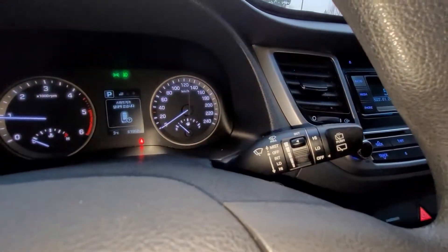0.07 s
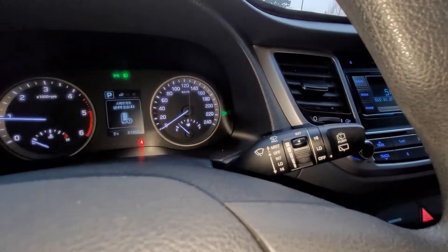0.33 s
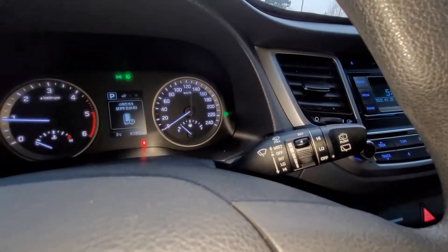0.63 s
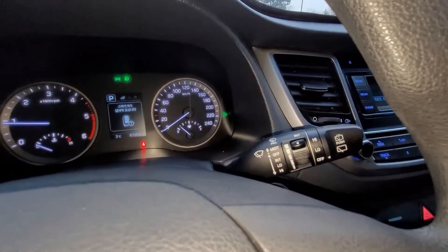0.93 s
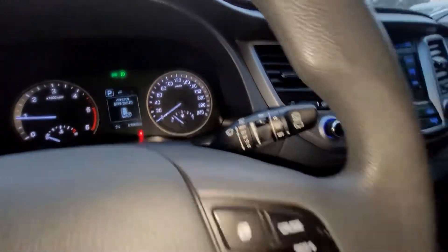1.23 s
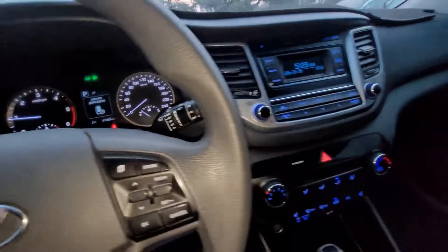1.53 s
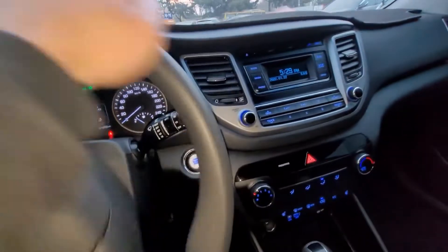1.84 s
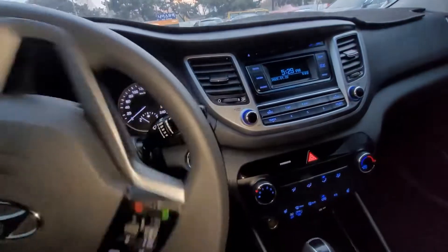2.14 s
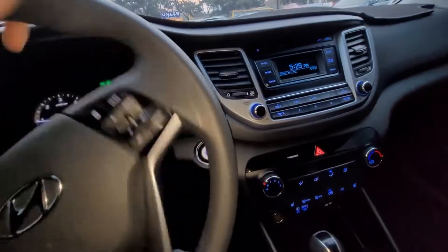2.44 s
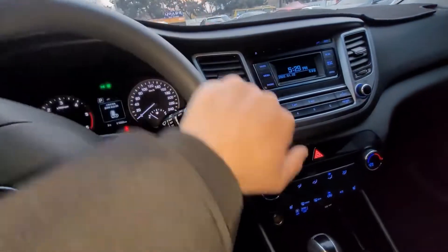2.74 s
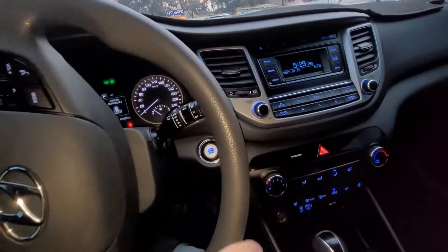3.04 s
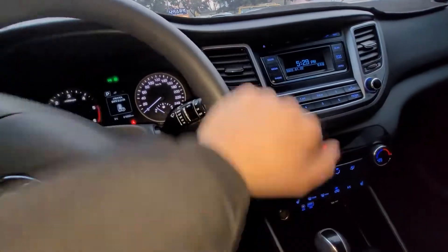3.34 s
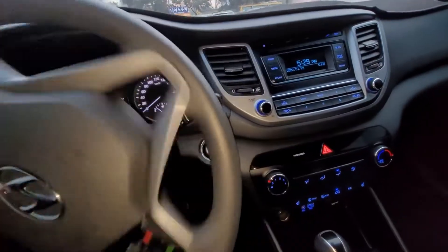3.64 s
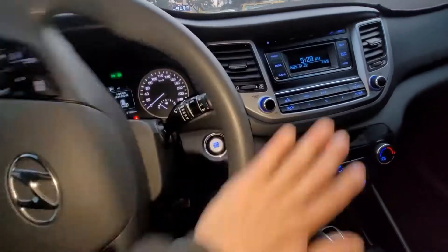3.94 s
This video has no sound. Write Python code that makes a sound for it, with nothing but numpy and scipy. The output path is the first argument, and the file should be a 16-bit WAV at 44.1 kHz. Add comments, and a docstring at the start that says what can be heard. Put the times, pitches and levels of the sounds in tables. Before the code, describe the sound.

Hands rub over a turning steering wheel inside a parked car. At first the engine idles with a low throb, a chugging hum and faint sleeve rustles. From about 1.2 seconds, hissing strokes swell over a low steering rumble and rough hum. Soft grip bumps come between 1.8 and 3.7 seconds. The rubbing dips near 3.3 seconds, then returns until 4 seconds, with the idle underneath.

```python
"""Inside a parked car the engine idles with a throbbing boom and a soft panel buzz. A steady, chugging
hum fills the cabin and sinks as the wheel turns. A sleeve rustles faintly, then from 1.2 s the steering
wheel is spun. Hand and sleeve slide over the grained rim in swelling strokes of hiss, the turning
column rumbles over a rough low hum, and the hand bumps the wheel a few times as it changes grip."""
import sys
import numpy as np
from scipy import signal
from scipy.fft import rfft, irfft, next_fast_len
from scipy.io import wavfile
from scipy.ndimage import uniform_filter1d, map_coordinates

SR = 44100
rng = np.random.default_rng(int(sys.argv[2]) if len(sys.argv) > 2 else 0)


def transcribe(signal):
    """Save signal, clipped to [-1, 1], as a 16-bit WAV file at the path in sys.argv[1]."""
    frames = np.atleast_2d(signal).T
    limited = np.clip(frames, -1, 1)
    pcm = np.round(limited * 32767).astype(np.int16)
    wavfile.write(sys.argv[1], SR, pcm)


N = 176400

CHUG_HZ, FIRST_CHUG_S = 20.01, 0.0141  # the beat shared by the chugging hum and the cabin noise

# Stereo width of rubbing hand and cloth. Each row: frequency in Hz, left-right likeness from -1 to 1.
RUB_LIKENESS = [(250, 0.45), (550, 1), (1100, 0.088), (1450, -0.47), (1750, -0.25), (2200, -0.012),
                (15000, 0.073)]
# Balance of the cabin, with the treble to the right. Each row: frequency in Hz, left minus right in dB.
CABIN_BALANCE = [(100, 4.5), (300, -1), (700, 0), (1300, -4), (2400, -11), (4400, -12), (8000, -4),
                 (15000, -3)]


def amp(db):
    """Decibels to gain."""
    return 10 ** (np.asarray(db) / 20)


def unit(x):
    """Scaled to rms 1."""
    return x / np.sqrt(np.mean(x ** 2) + 1e-20)


def along(points, hz):
    """(Hz, value) points read on a log axis."""
    knots_hz, values = np.transpose(points)
    return np.interp(np.log(hz + 1), np.log(knots_hz + 1), values)


def clock():
    """Time of every sample in seconds."""
    return np.arange(N) / SR


def curve(rows):
    """(s, value) points joined by straight lines."""
    return np.interp(clock(), *np.transpose(rows))


def wobble(rate):
    """A smooth random curve, rate knots a second."""
    return map_coordinates(rng.standard_normal(int(N * rate / SR) + 4), [clock() * rate])


def filtered(x, response):
    """x shaped by a response given as a function of Hz."""
    size = next_fast_len(N + SR // 2)
    return irfft(rfft(x, size) * response(np.fft.rfftfreq(size, 1 / SR)), size)[..., :N]


def white():
    """Two unrelated white noises."""
    return rng.standard_normal((2, N))


def coloured(pair, spectrum, likeness, balance=None):
    """Two unrelated signals given a spectrum, a left-right likeness and a balance; rms 1."""
    def mid_side_gains(hz):
        width = np.arccos(np.clip(along(likeness, hz), -1, 1)) / 2
        return amp(along(spectrum, hz)) * [np.cos(width), np.sin(width)]

    mid, side = filtered(pair, mid_side_gains)
    out = np.array([mid + side, mid - side])
    if balance is not None:
        out = filtered(out, lambda hz: amp(along(balance, hz) * np.array([[.5], [-.5]])))
    return unit(out)


def moving_contact(pair, patch_db=2.02, patch_hz=260, patch_s=.04, tilt_db=0.35, pivot_hz=5240):
    """Rubbing shifts colour as the contact moves: random patches of gain and a drifting treble."""
    hz, t, spectra = signal.stft(pair, SR, nperseg=512)
    patches = uniform_filter1d(rng.standard_normal(spectra.shape), round(patch_hz / hz[1]), axis=1)
    patches = uniform_filter1d(patches, round(patch_s / t[1]), axis=2)
    drift = np.interp(t, clock(), wobble(14))
    tilt = np.outer(np.tanh(np.log((hz + 1) / pivot_hz)), drift)
    gain = amp(patch_db * unit(patches) + tilt_db * tilt)
    return signal.istft(spectra * gain, nperseg=512)[1][:, :N]


def sliding_hand(slips_per_s=4500, slip_share=0.27, body_hz=3880, air_hz=8500, trim_db=2.1):
    """Countless tiny slips on the grained rim merge into a hiss that swells with each stroke."""
    # The strokes of the hand. Each row: time in seconds, level in dB before the trim.
    strokes = [(1.1, -95), (1.17, -75), (1.22, -68.5), (1.26, -57.5), (1.31, -50), (1.38, -44), (1.46, -39),
               (1.505, -38), (1.56, -43), (1.61, -45.5), (1.68, -43), (1.77, -43.5), (1.815, -36.5),
               (1.865, -43.5), (1.905, -40.5), (1.935, -46.5), (1.98, -47.5), (2.08, -38.5), (2.14, -37),
               (2.21, -44), (2.245, -42.5), (2.35, -47), (2.43, -43.5), (2.49, -46.5), (2.56, -44.5),
               (2.67, -48), (2.745, -45.5), (2.79, -40.5), (2.86, -41), (2.93, -40), (2.98, -42.5),
               (3.02, -45), (3.08, -47.5), (3.14, -49.5), (3.24, -52.5), (3.29, -60), (3.33, -60.5),
               (3.41, -53), (3.46, -45), (3.54, -39), (3.62, -44), (3.71, -44), (3.75, -42.5), (3.81, -41),
               (3.91, -46), (3.97, -41.5), (4, -36.5)]
    # Colour of the friction. Each row: frequency in Hz, relative density in dB.
    spectrum = [(150, -9), (400, 3), (650, 0.5), (1100, -0.6), (1280, -2.5), (1500, -1.8), (1720, -2),
                (2200, -0.8), (2900, -0.86), (4400, -2.5), (6000, -5), (7700, -4.5), (8600, -6),
                (10000, -5), (13000, -5), (15300, -8.5)]
    # Balance of the hiss. Each row: frequency in Hz, left minus right in dB.
    balance = [(500, -0.5), (1000, 0), (1700, -3), (3500, -3), (5000, -3), (6800, -3), (8500, -0.5),
               (10500, -0.7), (14000, 1)]
    # Where the hand rubs. Each row: time in seconds, left minus right in dB.
    position = [(1.25, -3), (1.42, -1.5), (1.65, -0.5), (2.1, 0), (2.25, -0.5), (2.6, 0), (2.9, -0.5),
                (3.6, -0.5), (4, 0.5)]
    # A heavier hand gives more body. Each row: time in seconds, shelf gain below body_hz in dB.
    hand_weight = [(1.25, 8), (1.45, 3), (1.65, 0.5), (1.85, -0.8), (2.15, -1.5), (2.5, 4), (2.85, -3.5),
                   (3.2, 0.8), (3.55, 0), (4, 1)]
    # Sheen on the strokes. Each row: time in seconds, shelf gain above air_hz in dB.
    sheen = [(1.3, 3.5), (1.5, -0.5), (1.68, 1.5), (1.82, -2), (1.97, -1), (2.14, -2), (2.3, 1.5),
             (2.5, 1.5), (2.7, -2), (2.8, 0), (2.93, -2), (3.15, 0), (3.4, -4), (3.55, 1), (3.68, -3.5),
             (3.78, 1.5), (4, -2)]
    slips = white() * amp(-1 * white())  # strengths scatter by a further 1 dB
    slips *= rng.random((2, N)) < slips_per_s / SR
    friction = np.sqrt(slip_share) * unit(slips) + np.sqrt(1 - slip_share) * white()
    hiss = coloured(moving_contact(friction), spectrum, RUB_LIKENESS, balance)
    body = filtered(hiss, lambda hz: 1 / (1 + (hz / body_hz) ** 2))
    air = filtered(hiss, lambda hz: 1 - 1 / (1 + (hz / air_hz) ** 4))
    shaped = hiss + (amp(curve(hand_weight)) - 1) * body + (amp(curve(sheen)) - 1) * air
    flutter_db = 0.5 * wobble(110)
    pan_db = curve(position) * np.array([[.5], [-.5]])
    return amp(curve(strokes) + trim_db + flutter_db + pan_db) * shaped


def grip_bumps(octave_db=-14):
    """The hand bumps the wheel as it changes grip: each soft blow swells and dies in a few cycles."""
    # Blows on the wheel. Each row: start in seconds, peak in dB, pitch in Hz, rise in seconds.
    blows = [(1.81, -19.5, 88.8, 0.018), (1.915, -26, 45.2, 0.03), (2.441, -26, 49.7, 0.041),
             (2.635, -28, 85, 0.016), (2.93, -27, 42.5, 0.035), (3.635, -19, 252, 0.0073),
             (3.636, -23, 94.2, 0.0068), (3.674, -19, 102, 0.0044), (3.69, -32, 246, .01)]
    out = np.zeros(N)
    for start, db, hz, rise in blows:
        t = np.maximum(clock() - start, 0)
        swing = np.sin(2 * np.pi * hz * t) + amp(octave_db) * np.sin(4 * np.pi * hz * t)
        envelope = (t / rise * np.exp(1 - t / rise)) ** 2
        out += amp(db) * envelope * swing
    return out


def steering_column(judder_db=1.5):
    """The wheel and its column rumble unevenly as they turn."""
    # Swells of the turning. Each row: time in seconds, level in dB.
    turning = [(1.2, -67), (1.4, -48), (1.75, -45), (1.83, -37), (1.95, -39), (2.1, -36.5), (2.3, -32.5),
               (2.5, -35), (2.65, -38), (2.85, -34), (3.05, -42), (3.25, -46), (3.45, -40), (3.62, -32.5),
               (3.8, -36), (4, -34)]
    # Colour of the rumble. Each row: frequency in Hz, relative density in dB.
    spectrum = [(15, -46), (40, -1.5), (75, -1.5), (125, -4), (190, -16.5), (290, -12.5), (390, -19),
                (450, -25.5), (600, -20.5), (900, -35), (1600, -39.5), (4000, -70)]
    # Its narrow stereo image. Each row: frequency in Hz, left-right likeness.
    likeness = [(100, 0.83), (300, 0.92), (700, 0.66)]
    return amp(curve(turning) + judder_db * wobble(35)) * coloured(white(), spectrum, likeness)


def steering_assist(pitch_jitter=0.0227, roughness_db=3.5):
    """A rough low hum, as of power steering, rises in pitch when the wheel is spun harder."""
    # Course of the hum. Each row: time in seconds, pitch in Hz, level in dB.
    effort = [(2.0, 122.3, -48), (2.3, 145.4, -41.5), (2.6, 138.4, -49), (2.9, 125.7, -46.5),
              (3.25, 124.2, -43), (3.502, 135.2, -60), (3.75, 142, -43), (4.0, 154.2, -43.5)]
    times, hz, db = np.transpose(effort)
    pitch = np.interp(clock(), times, hz) * (1 + pitch_jitter * wobble(24.98))
    level_db = np.interp(clock(), times, db) + roughness_db * wobble(30)
    return np.sqrt(2) * amp(level_db) * np.sin(2 * np.pi * np.cumsum(pitch) / SR)


def engine_idle(idle_hz=10.055, first_throb_s=.0305, throb_gap_s=.0335, second_throb_db=-1):
    """Low harmonics of the idle swing together in two throbs a cycle; high ones buzz in the panels."""
    # The engine's boom. Each row: multiple of the idle rate, level in dB.
    boom_harmonics = [(3, -43), (4, -44.5), (5, -75), (6, -40.5), (8, -62.5), (9, -52), (10, -54),
                      (12, -58.5), (15, -61.5), (18, -53), (21, -71)]
    # The panels' buzz. Each row: multiple of the idle rate, level in dB.
    buzz_harmonics = [(21, -62.5), (25, -72), (27, -61.5), (30, -59.5), (36, -61.5), (37, -62), (39, -54.5),
                      (48, -68.5)]
    # The buzz lifts as the turn begins, then eases. Each row: time in seconds, gain in dB.
    buzz_swell = [(1.1, -2.5), (1.45, 3), (1.8, 0.5), (2.5, -1), (4, -1)]
    unsteady_s = 0.00021 * wobble(5.94)
    angle = 2 * np.pi * idle_hz * (clock() - first_throb_s + unsteady_s)
    boom, buzz = np.zeros((2, N))
    for k, db in boom_harmonics:
        gain = amp(db + 0.475 * wobble(3.5))
        second_throb = amp(second_throb_db) * np.exp(2j * np.pi * k * idle_hz * throb_gap_s)
        scatter = 0.2 * k * idle_hz / 60 * rng.normal()  # 0.2 rad at 60 Hz, looser higher up
        boom += gain * np.sin(np.angle(1 + second_throb) - k * angle + scatter)
    for k, db in buzz_harmonics:
        buzz += amp(db + 0.95 * wobble(7.9)) * np.cos(k * angle + rng.uniform(0, 2 * np.pi))
    buzz *= amp(curve(buzz_swell))
    return np.sqrt(2) * (boom * amp([[-.8], [.8]]) + buzz * amp([[1], [-1]]))  # boom right, buzz left


def chugging_hum(top_tone_hz=350.1, waver_db=1.3):
    """A steady hum in the cabin whose few close tones beat in short chugs, twenty a second."""
    # Tones of the hum. Each row: steps of CHUG_HZ below the top tone, level in dB.
    tones = [(0, -50), (1, -52), (3, -60), (5, -63)]
    # It sinks as the wheel gets going, then partly returns. Each row: time in seconds, gain in dB.
    fade = [(1.25, 0.5), (1.6, -2.5), (1.8, -16), (4, -8)]
    t = clock() - FIRST_CHUG_S
    hum = np.zeros(N)
    for steps, db in tones:
        hz = top_tone_hz - steps * CHUG_HZ
        hum += amp(db + waver_db * wobble(7.7)) * np.cos(2 * np.pi * hz * t)
    return np.sqrt(2) * hum * amp(curve(fade)) * amp([[1], [-1]])


def cabin_noise(level_db=-45, chug_depth=0.33, chug_below_hz=550):
    """Dull engine noise whose low part chugs with the hum, with a little vent air on the right."""
    # Colour of the cabin. Each row: frequency in Hz, relative density in dB.
    spectrum = [(15, -29), (28, -4), (48, -0.5), (80, -7.5), (130, -14), (210, -12.5), (280, -12),
                (385, -10.5), (450, -18.5), (700, -26.5), (1200, -32), (2700, -38.5), (3150, -48),
                (7000, -53), (15000, -54)]
    # Its image, narrow in the bass and wide above. Each row: frequency in Hz, left-right likeness.
    likeness = [(60, 0.68), (380, 0.43), (950, 0.018), (2400, 0.13)]
    chug = np.cos(2 * np.pi * CHUG_HZ * (clock() - FIRST_CHUG_S))
    noise = coloured(white(), spectrum, likeness, CABIN_BALANCE)
    low = filtered(noise, lambda hz: 1 / (1 + (hz / chug_below_hz) ** 6))
    return amp(level_db) * (noise + chug_depth * chug * low)


def sleeve(stir_db=-77, flutter_db=1.6):
    """Short soft rustles before the turn, over a faint constant stirring of cloth."""
    # Moves of the sleeve. Each row: centre in seconds, peak in dB, half length in seconds.
    rustles = [(.012, -58.5, 0.041), (.1, -67.5, 0.025), (.165, -65.5, 0.029), (0.25, -67.5, 0.027),
               (.392, -64.5, 0.024), (.44, -71.5, 0.028), (0.52, -59.5, 0.028), (0.573, -65.5, 0.022),
               (0.678, -69, 0.027), (.737, -64, 0.032), (.807, -62.5, 0.023), (.89, -67.5, 0.059),
               (.985, -62.5, 0.021), (1.062, -68, 0.04)]
    # Bright colour of the cloth. Each row: frequency in Hz, relative density in dB.
    spectrum = [(500, -35), (1500, -13), (3200, -2), (4500, -0.5), (7000, -3.5), (14000, -6)]
    swells = sum(amp(db) * np.exp(-((clock() - centre) / half) ** 2) for centre, db, half in rustles)
    envelope = np.hypot(swells, amp(stir_db)) * amp(flutter_db * wobble(118.9))
    return envelope * coloured(moving_contact(white()), spectrum, RUB_LIKENESS, CABIN_BALANCE)


def scene():
    """Everything from the driver's seat; the wheel's low sounds reach the left ear first."""
    left_lead_s = 0.00025
    wheel = steering_column() + steering_assist() + grip_bumps()
    wheel = filtered(wheel, lambda hz: np.exp(1j * np.pi * hz * left_lead_s * np.array([[1], [-1]])))
    return wheel + engine_idle() + chugging_hum() + cabin_noise() + sliding_hand() + sleeve()


def record(dry):
    """Nothing above 15.5 kHz is kept."""
    return filtered(dry, lambda hz: hz < 15500)


dry = scene()
out = record(dry)
transcribe(out)
```